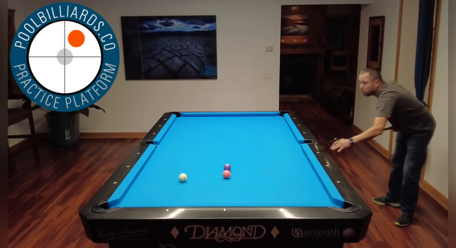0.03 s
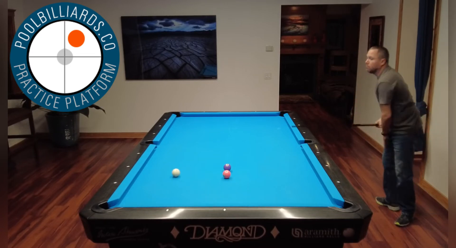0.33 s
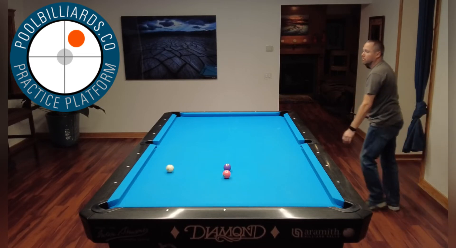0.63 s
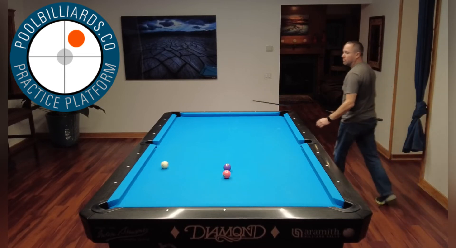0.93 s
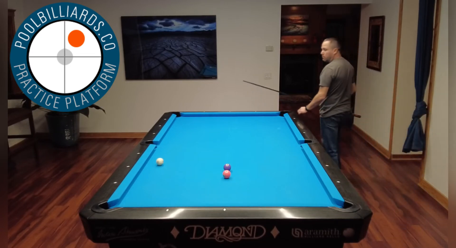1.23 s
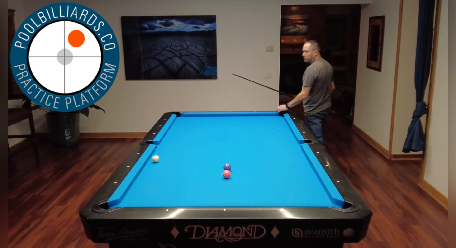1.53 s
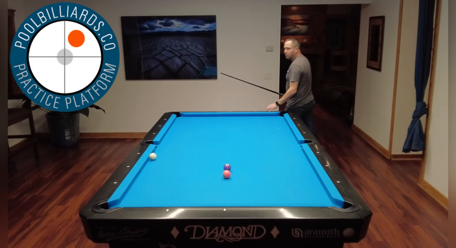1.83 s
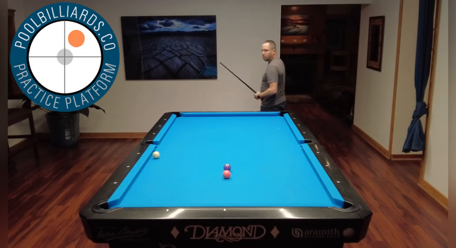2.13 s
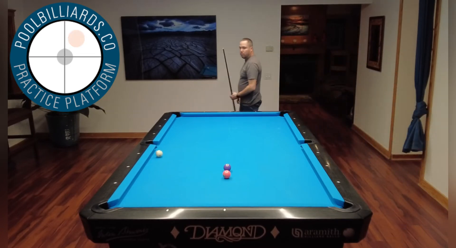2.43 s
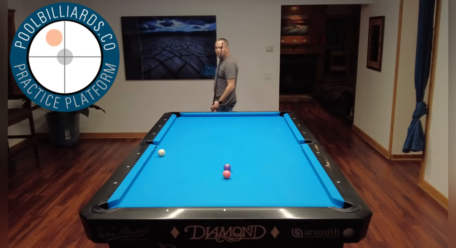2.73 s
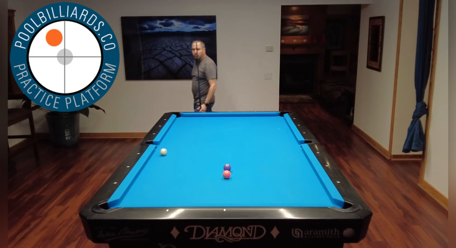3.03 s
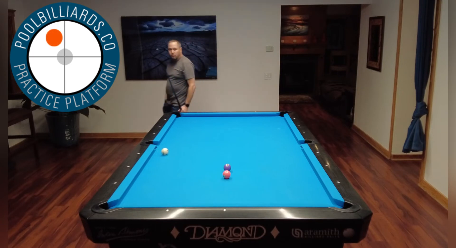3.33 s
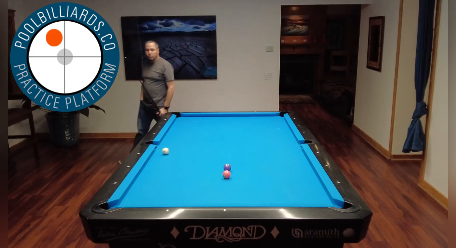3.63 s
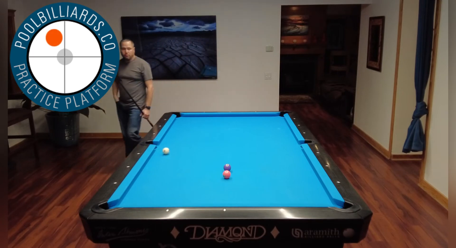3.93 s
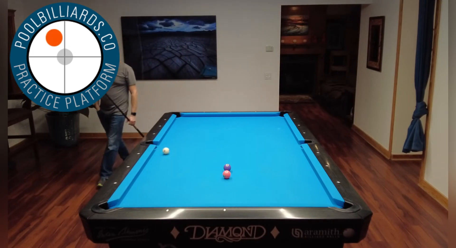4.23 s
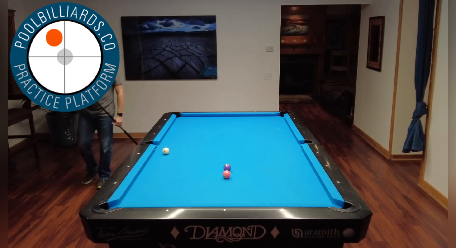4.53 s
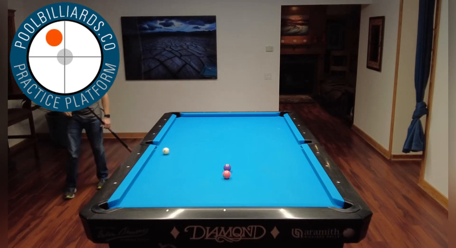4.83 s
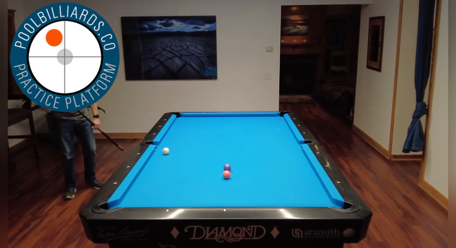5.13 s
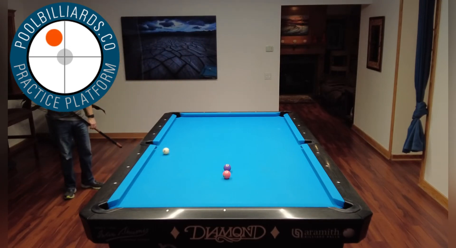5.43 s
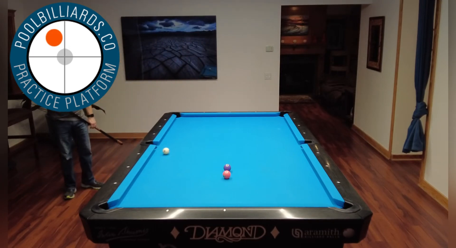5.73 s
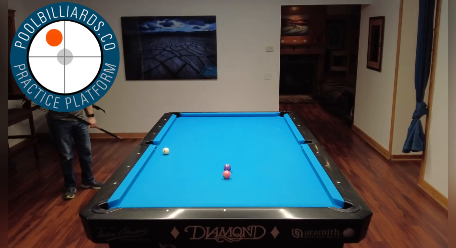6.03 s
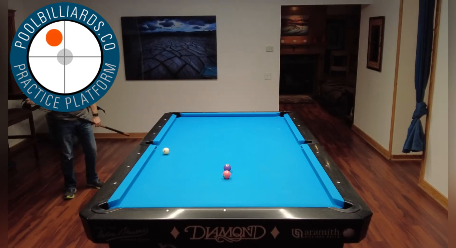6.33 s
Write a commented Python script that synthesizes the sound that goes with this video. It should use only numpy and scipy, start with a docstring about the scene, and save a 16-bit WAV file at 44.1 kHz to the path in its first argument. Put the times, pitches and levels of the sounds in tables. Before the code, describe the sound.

A potted pool ball knocks and rumbles through the table into its tray, followed by soft footsteps on a wooden floor.

```python
"""Potting a pool ball

A ball knocks into its pocket, drops into the return channel, rumbles along it and clacks into the tray.
Each knock makes the table's cabinet ring and boom in a wood-floored room, while the cue ball rolls out
on the slate with a deep hum. The player walks round the table with soft steps and scuffing soles, then
rubs his cue, which sings faintly and squeaks once. A faint, wavering hiss fades after five seconds."""
import sys
import numpy as np
from scipy import signal
from scipy.fft import rfft, irfft, next_fast_len
from scipy.io import wavfile

SR = 44100
rng = np.random.default_rng(int(sys.argv[2]) if len(sys.argv) > 2 else 0)


def digitize_waveform(pressure):
    """Quantize a signal to 16-bit integers and store it at the path in sys.argv[1].

    Rows of a 2-D input are taken as channels; values are limited to [-1, 1].
    """
    field = np.atleast_2d(pressure).T
    bounded = np.clip(field, -1, 1)
    quanta = np.round(bounded * 32767).astype(np.int16)
    wavfile.write(sys.argv[1], SR, quanta)


N = 290619
TIME = np.arange(N) / SR
BANDS = 25 * 2 ** (np.arange(29) / 3)  # band centres [Hz], three to an octave

# Levels are relative. A fade time (t60) is how long a sound takes to drop by 60 dB.
# still room and microphone hiss: (frequency [Hz], level [dB])
HUSH = [(25, -76.5), (45, -77), (80, -81.5), (130, -90), (300, -91), (450, -85.5), (900, -93.5),
        (1300, -90.5), (2200, -94), (3600, -94.5), (4900, -86.5), (8000, -89), (11500, -93.5), (14000, -81)]
# wavering background hiss: (frequency [Hz], level [dB])
HISS_TONE = [(100, -6), (400, 3), (900, 2), (1500, 1.5), (3000, -2), (6000, -7.5), (10000, -13.5),
             (16000, -15.5)]
# how long the room echoes: (frequency [Hz], fade time [s])
ROOM_FADE = [(100, .65), (250, 0.71), (600, 0.75), (1500, 0.73), (3000, 0.75), (6000, 0.6), (12000, 0.12)]
# peaks and dips of reflected sound: (frequency [Hz], width [Hz], level [dB])
ROOM_COLOUR = [(138, 27, -3.5), (179, 12.98, 2), (206.2, 4.6, 5), (366, 50, -2), (387, 51, 1.5),
               (563, 50, -1.5), (670, 60, 2), (990, 410, -1.5), (1328.6, 61, 2.5), (1980, 120, -0.5),
               (3049, 360, 3), (3660, 1000, -2), (4344, 220, 3), (7750, 460, 0.5)]
# how alike left and right sound: (frequency [Hz], likeness [1 = the same])
LIKENESS = [(60, 0.97), (170, 0.96), (300, .88), (550, 0.3), (1100, .3), (2200, .58), (4500, 0.17),
            (12000, 0.1)]

# the hand's pushes along the cue: (time [s], level [dB])
PUSHES = [(6.078, -80), (6.295, -80), (6.492, -78.5)]
# notes the cue sings at: (frequency [Hz], width [Hz], level [dB])
CUE_NOTES = [(1246, 63, 2.5), (1660, 46, -4), (2130, 150, 0.5), (3123, 400, 1), (4490, 480, -1),
             (5870, 310, -5.5)]
# soles and sleeves brushing: (time [s], swell time [s], level [dB], treble brightness [dB/octave])
SCUFFS = [(1.39, .025, -63, .8), (1.908, .018, -72.5, 3), (2.07, .026, -61.5, -13), (2.41, .04, -60.5, .5),
          (2.879, .034, -65, 4.2), (2.99, .071, -63.5, 1.5), (3.13, 0.039, -63, -15), (3.56, .06, -75, 3),
          (4.225, .034, -67.5, -9), (4.62, 0.035, -68, -1.5), (4.96, 0.08, -79, 1)]
# tone of a scuff: (frequency [Hz], level [dB])
SCUFF_TONE = [(80, -20), (300, -4.5), (550, -1.5), (900, -4), (1500, -.5), (3000, -5.5), (4500, -8.5),
              (6500, -14.5), (9000, -17.5), (15000, -30)]
# heels and toes landing: (time [s], level [dB], brightness [dB/octave], boom level [dB])
STEPS = [(3.498, -53, -4, -45.5), (3.7, -55, 2.0, -52), (4.09, -66.5, -1, -55), (4.513, -50, -3.2, -41.5),
         (4.752, -62.5, 3.2, -60)]
# tone of a soft step: (frequency [Hz], level [dB])
STEP_TONE = [(200, 0), (380, -2), (550, -6), (900, -10), (1500, -10), (2600, -19.5), (5000, -33.5)]
# colour that a shoe on floorboards adds: (frequency [Hz], level [dB])
SHOE_COLOUR = [(25, -42), (60, -18), (125, -7.5), (200, -2.5), (380, 1.5), (550, -0.5), (1000, -4.5),
               (1500, 1), (2200, 3.5), (3000, -3.5), (4000, -2.5), (5500, -2), (8000, -9), (16000, -22)]

# rumble of the slate: (frequency [Hz], level [dB])
SLATE_TONE = [(22, -22), (31, -6.5), (40, 0), (55, -15), (100, -24.5), (300, -41), (1000, -57)]
# rumble of the return channel: (frequency [Hz], level [dB])
CHANNEL_TONE = [(28, -28.5), (42, -14.5), (65, -1.5), (85, 4), (120, -13.5), (190, -8.5), (280, -26.5),
                (500, -27), (1000, -49), (3000, -57.5)]
# deep note of each table part and the floor: (frequency [Hz], swell time [s], tail level [dB])
DEEP_NOTES = {"pocket": (87, .028, -6), "cabinet": (67.5, .034, -6), "channel": (80, .028, -3),
              "tray": (70.5, .04, -20), "floor": (72, 0.027, -6)}
# notes each table part rings with: (frequency [Hz], level [dB], fade time [s])
PART_NOTES = { "pocket": [(186.6, -4.5, 0.44), (210, 0.5, .5), (239, -4, 0.501), (307.4, 0.5, 0.54),
              (380, -7, 0.802), (431, -4, .6), (517, -5, 0.68), (651, -2.5, 0.49), (1040, -1.5, .55),
              (1600, -3.5, .55)], "cabinet": [(145.3, -4, 1.16), (183, -1.5, 1.5), (231, 1.5, .65),
              (314.4, -7, 1.01), (447.7, -2, 0.33), (503, 1, 0.61), (621, -11.5, 0.83), (700, 2.5, 0.699),
              (748, -5.5, 1.1), (1240, 3, .65), (1350, -.5, .55), (1836, -2, .35), (2572, 5.5, .42)],
              "channel": [(228.4, 3, 0.95), (281, 2.5, 0.7), (432, -3.5, 0.29), (513, 2, .55),
              (583, -1.5, .45), (700, 5, 0.6), (926, 0, 0.79), (1054, 0.5, 0.8), (1116, -6, .35),
              (1185, -6.5, 1), (2060, 3, 0.447), (3020, 5, 0.5), (3170, 4, 0.62)],
              "tray": [(232.3, 4.5, 0.58), (271.7, 4, .65), (441, -1.5, .6), (517, -2, 0.49),
              (692, 0.5, 0.51), (765, -8, .35), (1125, -4.5, 0.29), (1230, -1.5, 0.59), (1482, 0.5, 0.51),
              (1703, -6, 0.86), (2175, 2.5, .35), (2700, -1.5, 0.6), (3060, 1, 0.62), (4646, -0.5, .2)]}
# tone of a knock on each part: (frequency [Hz], level [dB])
PART_TONE = {"pocket": [(200, 0), (550, -2.5), (1500, -19), (5000, -37)], "cabinet": [(200, 0), (350, 1.5),
             (550, -1), (1200, -10), (2800, -17.5), (4200, -27.5), (8000, -25)], "channel": [(200, 0),
             (550, 11), (1500, -3.5), (2100, -12), (2600, -21), (3100, -17.5), (5000, -24.5)],
             "tray": [(130, -7), (240, 3), (380, 0), (550, 3), (1400, 1.5), (2300, -2.5), (5500, -7.8),
             (12000, -13)]}
# colour that the wood adds to every knock: (frequency [Hz], level [dB])
WOOD_COLOUR = [(25, -41), (60, -19.5), (120, -7.5), (200, -3.5), (550, -2), (700, -2.5), (900, -7),
               (1300, 0.5), (2000, -2.5), (2900, 0), (5500, -3), (8000, -13), (11000, -18.5),
               (16000, -21.5)]
# the ball's knocks:
# (part struck, time [s], level [dB], brightness [dB/octave], bass build-up [s], boom level [dB])
KNOCKS = [("pocket", -0.043, -47, .6, .04, -35.5), ("pocket", .17, -55, -3, .01, -39.5),
          ("pocket", .252, -32.5, -.5, .012, -27.5), ("pocket", .307, -37.5, .3, .012, -27),
          ("cabinet", .603, -26, -.2, .022, -42), ("cabinet", .636, -25.5, -3.9, 0.0037, -20),
          ("pocket", .735, -42, -4, .015, -27), ("cabinet", .900, -37.5, -6.5, .013, -35),
          ("channel", 1.101, -40, 0, .028, -35), ("tray", 2.534, -37.5, 0, .05, -22.5),
          ("tray", 2.600, -34, -10, .012, -44)]

# long sounds: (start [s], fade-in [s], stop [s], level [dB], change [dB/s], fade time [s])
HISS_SPAN = (-0.27, 0, 5, -79, 0.26, 1.1)
SLATE_ROLL = (-0.11, .3, 4, -45, -3, .5)
CHANNEL_ROLL = (1.38, .25, 2.5, -52.8, 3, .25)


def undb(db):
    """Turn decibels into a gain."""
    return 10 ** (np.asarray(db) / 20)


def at_hz(points, hz):
    """Read between (frequency, value) points, with octaves evenly spaced."""
    freqs, values = np.transpose(points)
    return np.interp(np.log(hz), np.log(freqs), values)


def after(start):
    """The samples in the second after `start`, and their age in seconds."""
    span = slice(max(int(start * SR) + 1, 0), int((start + 1) * SR))
    return span, TIME[span] - start


def swell(age, rise):
    """A smooth hump that peaks at 1 after `rise` seconds."""
    return (age / rise * np.exp(1 - age / rise)) ** 2


def ring(age, rise, t60):
    """A level that builds up to 1 and dies away."""
    shape = (1 - np.exp(-age / rise)) * np.exp(-np.log(1000) * age / t60)
    return shape / shape.max()


def bell(hz, centre_hz, width_hz):
    """A bell-shaped peak around one frequency."""
    return 1 / (1 + ((hz - centre_hz) / (.78 * width_hz)) ** 2)


def flutter(rate_hz, depth_db):
    """A gain that wanders at random."""
    knots = rng.standard_normal(N // 100)
    return undb(depth_db * np.interp(TIME * rate_hz, np.arange(len(knots)), knots))


def sustain(start, fade_in, stop, db, db_per_s, t60):
    """Gain of a long sound: it sets in, grows or wanes evenly, then dies away."""
    onset = np.clip((TIME - start) / fade_in, 0, 1) if fade_in else 1
    held_db = db + db_per_s * (np.minimum(TIME, stop) - start)
    fade_db = -60 * np.maximum(TIME - stop, 0) / t60
    return onset * undb(held_db + fade_db)


def pan(db):
    """Left and right gains; the left is louder by `db`."""
    return undb(np.array([[1], [-1]]) * db / 2)


def room_noise():
    """Stereo noise like sound bouncing round a room, split into bands: (band, side, sample)."""
    size = next_fast_len(N)
    hz = np.maximum(np.arange(size // 2 + 1) * SR / size, 1)
    alike = at_hz(LIKENESS, hz)
    colour = undb(sum(db * bell(hz, centre, width) for centre, width, db in ROOM_COLOUR))
    mid, side = rfft(rng.standard_normal((2, size))) * colour
    pair = mid * np.sqrt(1 + alike) + np.array([[1], [-1]]) * side * np.sqrt(1 - alike)
    noise = np.empty((len(BANDS), 2, N), np.float32)
    for k, centre in enumerate(BANDS):
        window = np.maximum(1 - 3 * abs(np.log2(hz / centre)), 0)
        noise[k] = irfft(pair * window, size)[:, :N] / np.sqrt(2 * np.mean(window ** 2))
    return noise


def tint(noise, db):
    """Mix the noise bands at the given levels."""
    return np.tensordot(undb(db).astype(np.float32), noise, 1)


def blow_db(db, brightness, tone, colour, hz):
    """Level of a blow at any frequency: harder contact gives more treble."""
    octaves = np.log2(np.clip(hz, 200, 5000) / 200)
    return db + brightness * octaves + at_hz(tone, hz) + at_hz(colour, hz)


def blows(noise, hits, colour, crack_db, crack_s, contact_s, echo_scale=1):
    """Each blow cracks, then fills the room with echoes; the bass arrives last."""
    out = np.zeros((2, N))
    for tone, start, level_db, brightness, build in hits:
        span, age = after(start)
        crack = undb(crack_db + brightness) * np.exp(-age / crack_s) * (1 - np.exp(-age / contact_s))
        for band, hz, db in zip(noise, BANDS, blow_db(level_db, brightness, tone, colour, BANDS)):
            echo = ring(age, build * min(200 / hz, 2), echo_scale * at_hz(ROOM_FADE, hz))
            out[:, span] += undb(db) * band[:, span] * (echo + crack * hz / (hz + 300))
    return out


def still_room(noise):
    """A faint, steady hush lies under everything."""
    return tint(noise, at_hz(HUSH, BANDS) - 1.7)


def background_hiss(noise):
    """A faint, wavering hiss that fades after five seconds."""
    waver = flutter(rate_hz=8, depth_db=1.4)
    return tint(noise, at_hz(HISS_TONE, BANDS) - 5) * sustain(*HISS_SPAN) * waver


def cue_squeak(start=6.16, level_db=-81.5):
    """For a moment the rubbing on the cue catches on one high note."""
    hz = np.arange(N // 2 + 1) * SR / N
    note = irfft(rfft(rng.standard_normal((2, N))) * bell(hz, centre_hz=4550, width_hz=260), N)
    return undb(level_db) * note / note.std() * swell(np.maximum(TIME - start, 0), rise=.07)


def cue_rubs(swell_s=.033):
    """A hand rubs to and fro on the cue and makes it sing faintly."""
    hz = np.arange(N // 2 + 1) * SR / N
    out = np.zeros((2, N))
    # a push, then a softer and brighter pull
    for lag_s, stroke_db, brightness in ((0, 0, 0), (.09, -5.5, 3)):
        colour = 0
        for centre, width, db in CUE_NOTES:
            gain = undb(db + brightness * np.log2(centre / 2500)) * np.sqrt(SR / 2 / width)
            colour += gain * bell(hz, centre, width)
        friction = irfft(rfft(rng.standard_normal((2, N))) * colour, N)
        for start, db in PUSHES:
            span, age = after(start + lag_s)
            shape = np.maximum(swell(age, swell_s), ring(age, swell_s, t60=.82) / 2)
            out[:, span] += undb(db + stroke_db) * friction[:, span] * shape
    return out * flutter(rate_hz=74, depth_db=1.5)


def scuffs(noise, tail_db=-1):
    """Soles and sleeves brush: each rub swells up in uneven grains and fades into the room."""
    out = np.zeros((2, N))
    grain = flutter(rate_hz=120, depth_db=.7)
    treble_octaves = np.log2(np.clip(BANDS, 1500, 6000) / 1500)
    for start, rise, db, brightness in SCUFFS:
        span, age = after(start)
        shape = np.maximum(swell(age, rise) * grain[span], undb(tail_db) * ring(age, rise, t60=.72))
        band_db = db + at_hz(SCUFF_TONE, BANDS) + brightness * treble_octaves
        out[:, span] += tint(noise[:, :, span], band_db) * shape
    return out


def footsteps(noise, build_s=.028):
    """Heels and toes land softly on the floorboards."""
    hits = [(STEP_TONE, start, db, brightness, build_s) for start, db, brightness, _ in STEPS]
    return blows(noise, hits, SHOE_COLOUR, crack_db=3.5, crack_s=.0094, contact_s=.0021)


def slate_roll(noise, start_hz=41, sink_hz_per_s=2.3):
    """The cue ball hums deep in the slate, lower and softer as it slows."""
    pitch_hz = start_hz - sink_hz_per_s * TIME
    hum = undb(4) * np.sin(2 * np.pi * np.cumsum(pitch_hz) / SR) * flutter(rate_hz=7, depth_db=1.5)
    rumble = tint(noise, at_hz(SLATE_TONE, BANDS) - 6)
    return (hum + rumble) * sustain(*SLATE_ROLL)


def channel_roll(noise):
    """The potted ball bumps down the return channel, louder as it gathers speed."""
    bumps = flutter(rate_hz=18, depth_db=1.3)
    return tint(noise, at_hz(CHANNEL_TONE, BANDS)) * sustain(*CHANNEL_ROLL) * bumps


def booms(floor_lag_s=.008):
    """The table or floor heaves after each knock or step; the room holds the deep note a little."""
    out = np.zeros(N)
    heaves = [(part, start + build, db) for part, start, _, _, build, db in KNOCKS]
    heaves += [("floor", start + floor_lag_s, db) for start, _, _, db in STEPS]
    for part, start, db in heaves:
        hz, rise, tail_db = DEEP_NOTES[part]
        span, age = after(start)
        shape = np.maximum(swell(age, rise), undb(tail_db) * ring(age, rise, t60=.57))
        out[span] += undb(db) * np.sqrt(2) * np.sin(2 * np.pi * hz * age) * shape
    return out


def panel_thuds(pitch_hz=205, boost_db=7.5):
    """The cabinet panel gives a short thud, stronger the more squarely the ball lands."""
    out = np.zeros(N)
    for _, start, db, _, build, _ in KNOCKS:
        span, age = after(start)
        squareness = min(.004 / build, 1)  # a square hit builds up within 4 ms
        note = np.sqrt(2) * np.sin(2 * np.pi * pitch_hz * age)
        out[span] += undb(db + boost_db) * squareness * note * swell(age, rise=.008)
    return out


def cabinet_ring(group_size=5):
    """The struck part rings; its higher notes come in close groups that waver against each other."""
    out = np.zeros((2, N))
    for part, start, level_db, brightness, build, _ in KNOCKS:
        span, age = after(start)
        for hz, db, t60 in PART_NOTES[part]:
            highness = min(hz / 1200, 1)
            phase, detune, apart = rng.standard_normal((3, group_size, 1, 1))
            group_hz = hz + 14 * np.sqrt(hz / 1000) * detune
            offset = np.array([[1], [-1]]) * apart * highness / 8  # left and right are out of step
            waves = np.sin(2 * np.pi * (group_hz * age + phase + offset))
            share = np.r_[1, np.full(group_size - 1, highness)]
            note = np.tensordot(share / np.linalg.norm(share), waves, 1)
            gain = undb(db + blow_db(level_db, brightness, PART_TONE[part], WOOD_COLOUR, hz))
            out[:, span] += gain * note * ring(age, build * 200 / hz, t60)
    return out


def ball_knocks(noise):
    """The hard ball strikes the pocket, cabinet, channel and tray."""
    hits = [(PART_TONE[part], *blow) for part, *blow, _ in KNOCKS]
    return blows(noise, hits, WOOD_COLOUR, crack_db=5.5, crack_s=.014, contact_s=.0018, echo_scale=.99)


def scene():
    """Table and player over the still room; the player and the wavering hiss drift right to left."""
    near, air = room_noise(), room_noise()
    near_backwards, air_backwards = near[:, :, ::-1], air[:, :, ::-1]
    table = undb(-3.5) * ball_knocks(near) + cabinet_ring() + panel_thuds()
    rolling = channel_roll(near_backwards) + slate_roll(near_backwards)
    player = undb(-4) * footsteps(near) + undb(-4.27) * scuffs(near_backwards)
    player += undb(-.5) * cue_rubs() + cue_squeak()
    hiss = background_hiss(air_backwards)
    drift = pan(-1.2 + .5 * np.minimum(TIME, 5))
    return (table + rolling + booms()) * pan(.66) + (player + hiss) * drift + still_room(air)


def record(dry, top_hz=15750):
    """A steep filter cuts off the highest treble."""
    return signal.sosfilt(signal.ellip(10, .2, 70, top_hz, fs=SR, output="sos"), dry)


dry = scene()
out = record(dry)
digitize_waveform(out)
```